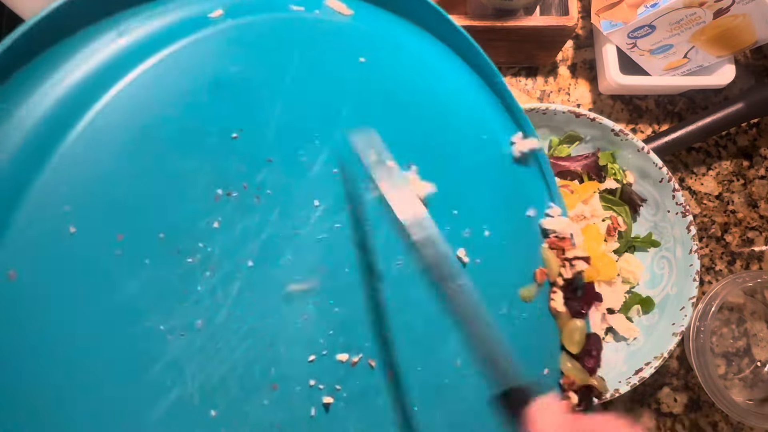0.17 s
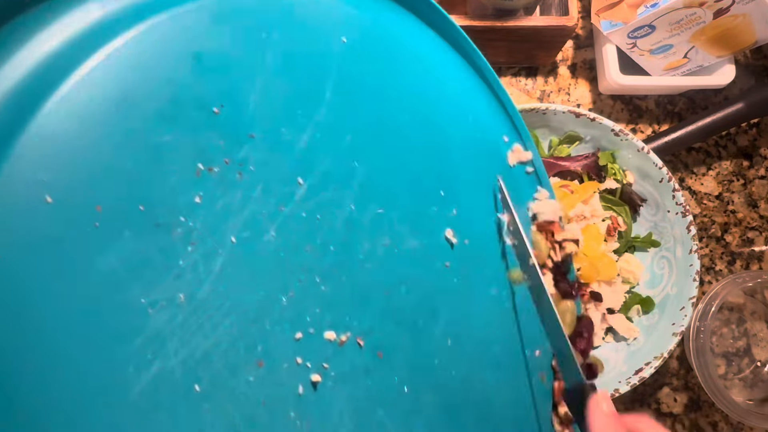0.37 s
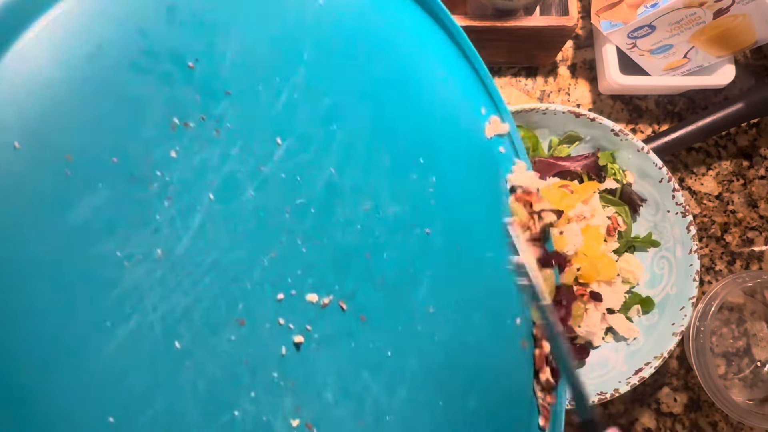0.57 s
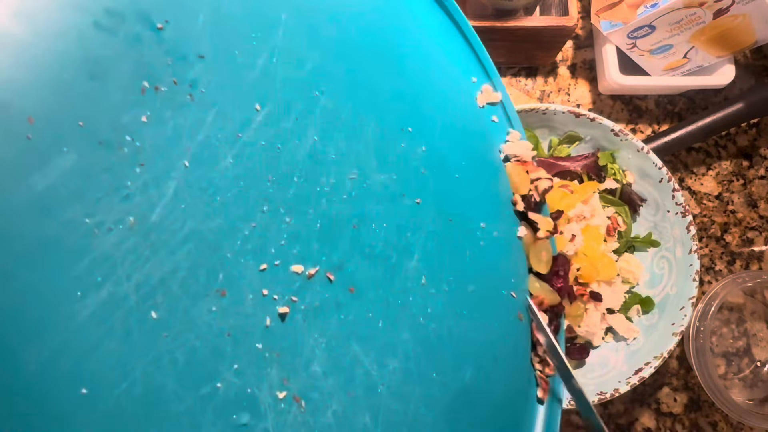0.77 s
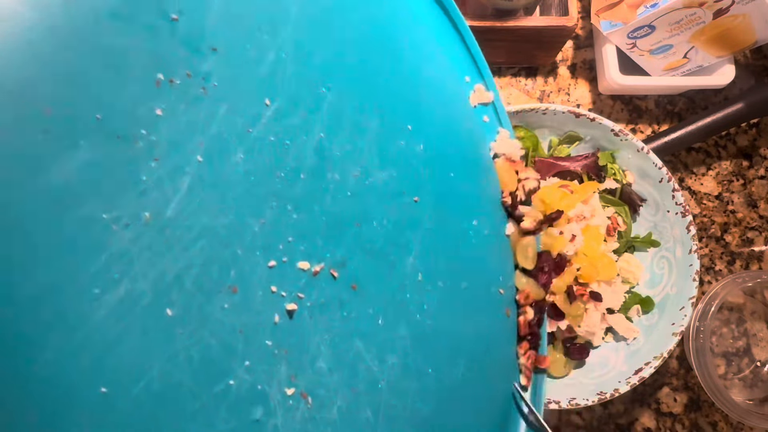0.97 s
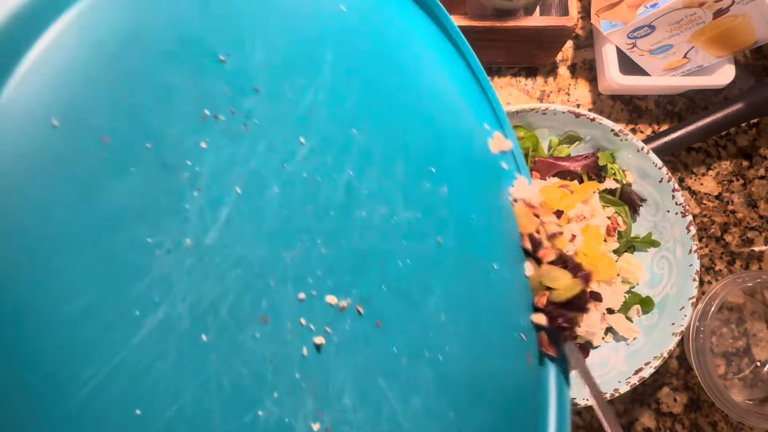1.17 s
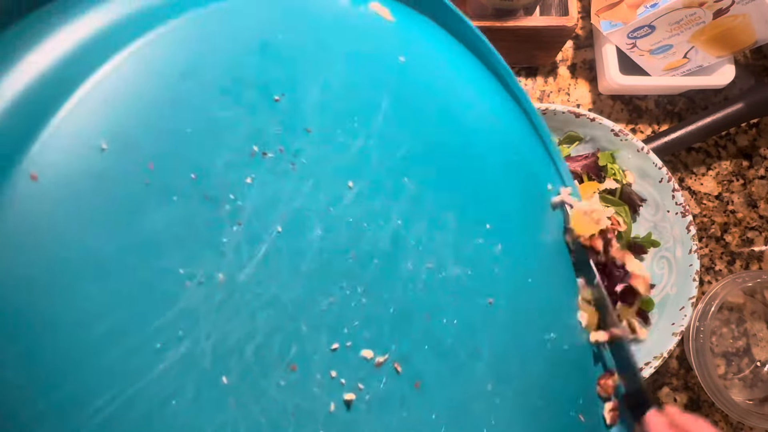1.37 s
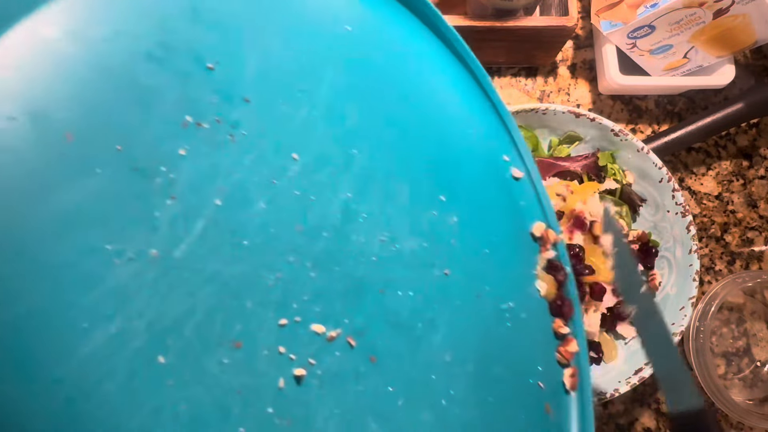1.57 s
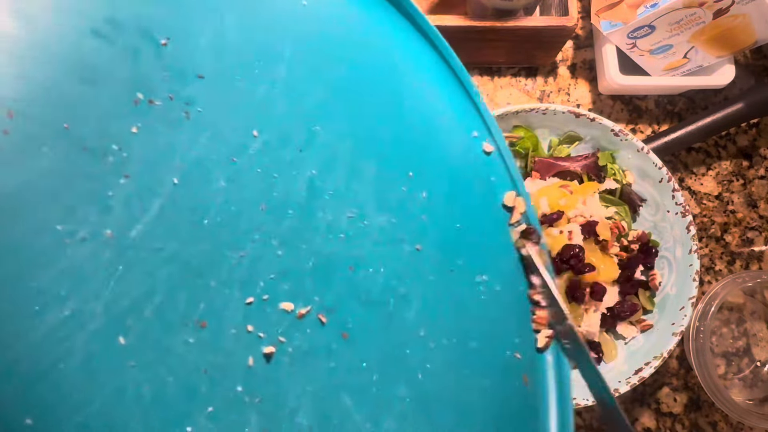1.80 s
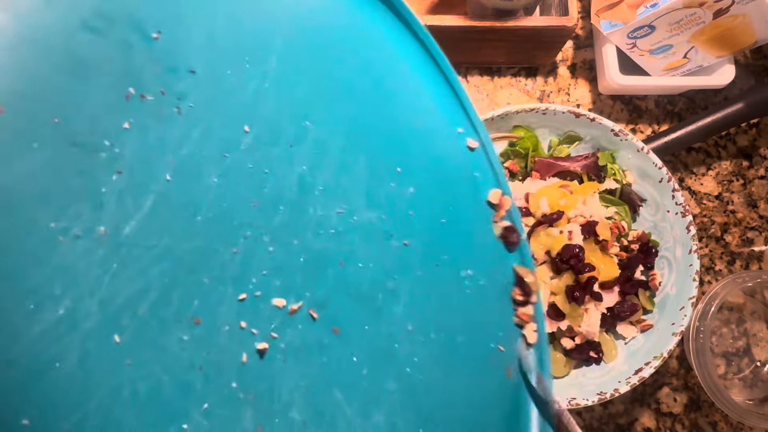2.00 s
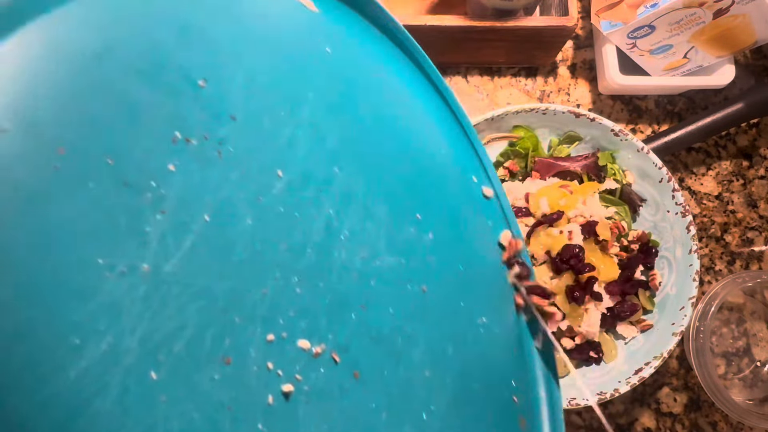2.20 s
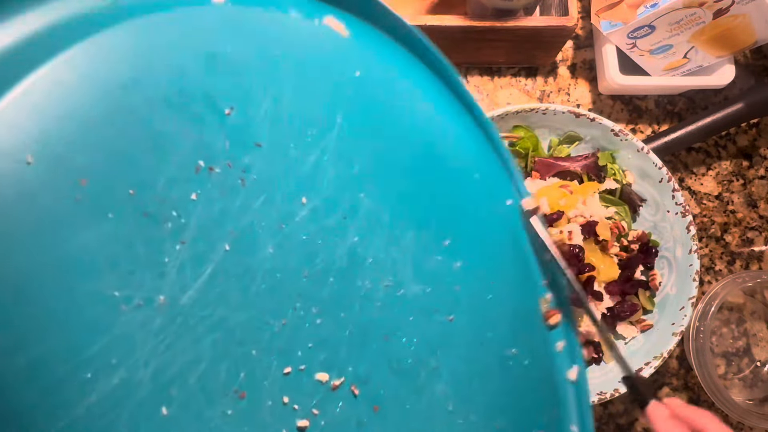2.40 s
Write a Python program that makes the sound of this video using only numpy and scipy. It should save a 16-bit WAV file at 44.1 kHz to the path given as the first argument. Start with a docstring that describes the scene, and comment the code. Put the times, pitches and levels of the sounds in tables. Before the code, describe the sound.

Knife scraping and knocking on a thin plastic board as soft food bits drop off.

```python
"""Knife clearing a cutting board

A kitchen knife sweeps chopped food off a thin plastic board into a bowl, close by in a small kitchen.
The blade lands, bounces and scrapes. Each contact sends a bending wave through the sheet (treble first,
a tiny falling chirp) and rings its modes; heavy ones make the whole board wobble.
Crumbs crackle ahead of the blade, soft food pats on the board and into the bowl, an appliance hums."""
import sys
import numpy as np
from scipy import signal
from scipy.fft import rfft, irfft, next_fast_len
from scipy.io import wavfile

SR = 44100
rng = np.random.default_rng(int(sys.argv[2]) if len(sys.argv) > 2 else 0)


def dump_mix(stems):
    """Bounce the given channels to the path in sys.argv[1] as a 16-bit WAV at rate SR."""
    frames = np.atleast_2d(stems).T  # one column per channel
    limited = np.clip(frames, -1, 1)  # hard clip at full scale
    pcm = np.round(limited * 32767).astype(np.int16)
    wavfile.write(sys.argv[1], SR, pcm)


N = 108045
SIZE = next_fast_len(N + SR // 2)   # layers are mixed as spectra, with room for their tails
HZ = np.maximum(np.arange(SIZE // 2 + 1) * SR / SIZE, 1)
TIME = np.arange(SIZE) / SR
SIDE = np.array([[1], [-1]])   # left plus, right minus


def from_db(db):
    """Decibels to gain."""
    return 10 ** (np.asarray(db) / 20)


def unit_rms(x):
    """Scale to rms 1."""
    return x / np.sqrt(np.mean(x ** 2) + 1e-20)


def curve(points):
    """Join (f/Hz, value) breakpoints on a log-frequency axis."""
    hz, value = np.transpose(points)
    return np.interp(np.log(HZ), np.log(hz), value)


def high_pass(hz, order=2):
    """Response of a causal low cut."""
    return signal.freqz(*signal.butter(order, hz, "high", fs=SR), worN=HZ, fs=SR)[1]


def click_at(start):
    """Spectrum of a unit click, its start in seconds."""
    return np.exp(-2j * np.pi * HZ * start)


# EQ points of an impact: f/Hz
IMPACT_BANDS = [130, 420, 1300, 2400, 5000, 9000]
# blade hits and bounces, plus the low thud of one food drop at 0.704 s:
# t/s, then relative level/dB at each EQ point
IMPACTS = [(0.2085, 26, 21, 12, 9, 1, -26), (0.2249, 20, 11, 10, 9, -16, -17),
           (0.2404, -4, 20.5, 3, -9, -6, -11), (.2455, 27.5, 16.5, 12, -11, 1, -13),
           (0.2598, -5, 15, 3, 13, -21, -7), (0.2711, 13, 4, 11.5, -4, 9, -31),
           (.2962, -13, 6, 11, 7, -16, -5), (.3008, -16, 6, -6, 0, -1, -5.5),
           (0.325, -29, 5, 1, 3.5, -14, -8), (0.4983, 28.5, 18, 5.5, -2, -0.5, -30),
           (0.5226, 8, 17.5, 1.5, -21, -12, -33), (0.5277, 18, 12.5, 9.5, -6, -18, -15),
           (.547, 19, -16, -2.5, 4.5, -25, -9.5), (0.6386, -22, -15, -4, -2.5, -1.5, -15),
           (0.704, 1, 2.5, -9, -16, -26, -38), (0.8913, -31, -15, -11, -7, -31, -47),
           (0.907, 6, 4.5, -1.5, 3, -9.5, -29), (0.9343, -9, 1, -8, -6, -15.5, -40),
           (0.9827, -10, 4.5, 4, -2, -8.5, -32), (1.5553, -3, -16, 0.5, -6, -5, -32),
           (1.5818, -10, -17, -7, -8.5, -11.5, -42), (1.7005, 22, 22, 15, 8.5, 7, -7),
           (1.7125, 29, 4.5, 6.5, -2.5, 2, -14), (1.7215, 23.5, 13, -22, -16, -1.5, -14),
           (1.7448, -3, -2, -8, -18, -17, -16), (1.9809, -3, 5, 3, -8.5, -16, -19.5),
           (2.03, 25.5, 8.5, 3, 8, 2, -7.5)]
def impacts(chatter_s=0.0022, chatter_hz=3000):
    """Blade contacts and one food thud, each a coloured click; the treble chatters as the edge settles."""
    share = 0.99 / (1 + (chatter_hz / HZ) ** 3)
    fade = np.exp(-TIME[:SR // 20] / chatter_s)
    out = 0
    for start, *levels in IMPACTS:
        chatter = rfft(rng.standard_normal(len(fade)) * fade / np.sqrt(np.sum(fade ** 2)), SIZE)
        colour = from_db(curve(list(zip(IMPACT_BANDS, levels))))
        out += click_at(start) * colour * (np.sqrt(1 - share) + np.sqrt(share) * chatter)
    eq_db = curve([(300, -5.5), (1300, -1.5), (4000, -4.5), (9000, -2), (12000, 0.5), (16000, -9)])
    return out * high_pass(hz=94) * from_db(eq_db)


def slips(eq, per_s, spread_db):
    """Tiny random slips of the edge, uneven in size: a grain texture at rms 1."""
    sizes = from_db(spread_db * np.minimum(rng.exponential(1, SIZE), 4))
    signs = rng.choice([-1, 1], SIZE)
    clicks = sizes * signs * (rng.random(SIZE) < per_s / SR)
    return unit_rms(irfft(rfft(clicks) * from_db(curve(eq)), SIZE))


def blade_travel(spectrum, depth_db=3.5, shifts_per_s=14):
    """Each third of an octave swells and fades on its own as the blade moves over the sheet."""
    band_index = np.clip(3 * np.log2(HZ / 400), 0, 14)
    out = 0
    for k in range(15):
        swell = np.interp(TIME * shifts_per_s + rng.random(), np.arange(200), rng.standard_normal(200))
        band = irfft(spectrum * np.maximum(1 - abs(band_index - k), 0), SIZE)
        out += band * from_db(depth_db * swell)
    return rfft(out)


# scrape envelopes, one list a stroke: t/s, relative hiss level/dB, relative grit level/dB
STROKES = [
    [(0, -53, -38), (.045, -68, -87), (.12, -73, -71)],
    [(.225, -52, -30.5), (.25, -41.5, -27), (.272, -31, -23), (.3, -34.5, -29), (.328, -37, -48),
     (.345, -54, -73), (.42, -70, -60)],
    [(.505, -70, -39), (.516, -43, -26), (.537, -35.5, -34), (.555, -47.5, -52), (.575, -60, -50),
     (.63, -64, -76)],
    [(.99, -63.5, -43.5), (1.04, -49.5, -45), (1.09, -44.5, -39), (1.125, -53, -40), (1.19, -45.5, -41),
     (1.255, -43, -48.5), (1.34, -48.5, -47), (1.425, -64.5, -46), (1.495, -49, -47.5), (1.53, -68, -68),
     (1.66, -78, -88)],
    [(1.705, -58, -60), (1.73, -39.5, -56), (1.755, -51.5, -50), (1.78, -60, -61), (1.84, -88, -62)],
    [(1.998, -60, -65), (2.008, -44.5, -43), (2.022, -58, -84), (2.065, -57.5, -41.5), (2.125, -39, -46),
     (2.16, -45, -47), (2.2, -54, -40), (2.26, -48, -52), (2.33, -56.5, -45), (2.38, -59.5, -58.5),
     (2.398, -48, -40.5), (2.45, -122, -113)],
]
# EQ of the bright hiss: f/Hz, level/dB
HISS_EQ = [(1000, -3), (2400, -4), (3500, -1), (5700, -0.5), (7200, -5), (9500, -7), (11500, -21.5),
           (15500, -17)]
# EQ of the coarse grit: f/Hz, level/dB
GRIT_EQ = [(120, -24.5), (300, -11), (550, -1), (850, 1.5), (1600, 6.5), (2400, -3), (4000, -6),
           (9000, -62)]
def blade_scrape():
    """The edge hisses over fine texture and catches on scratches; hard pressure adds a top sizzle."""
    hiss_env = grit_env = 0
    for stroke in STROKES:
        times, hiss_db, grit_db = np.transpose(stroke)
        hiss_env += from_db(np.interp(TIME, times, hiss_db, left=-200, right=-200))
        grit_env += from_db(np.interp(TIME, times, grit_db, left=-200, right=-200))
    sizzle = unit_rms(irfft(rfft(rng.standard_normal(SIZE)) * high_pass(hz=10800, order=3), SIZE))
    sizzle_env = from_db(-43) * (hiss_env / hiss_env.max()) ** 1.9

    def friction():
        hiss = hiss_env * slips(HISS_EQ, per_s=9000, spread_db=4)
        grit = grit_env * slips(GRIT_EQ, per_s=500, spread_db=3)
        return rfft(hiss + from_db(-5) * grit)

    mid = friction()
    side = 0.7 * friction() * curve(STEREO_WIDTH) * SIDE
    return blade_travel(mid) + side + rfft(sizzle_env * sizzle)


# ring of the sheet: f/Hz, level/dB over the direct wave, t60/s before the cap
SHEET_MODES = [(178.6, 4, 0.086), (311.4, 2, 0.12), (345, 0, 0.37), (403.3, 1.5, 0.18), (495.7, 4, 0.048),
               (603.2, 6.5, 0.16), (646, 4.5, .1), (1135, -3, 0.15), (1094, -35, 0.035),
               (1282, -41.5, 0.12), (1500, -12, 0.046), (1775, -9.5, 0.033), (1870, -15.5, 0.03),
               (2200, -3, 0.072)]
def board_response(t60_cap_s=0.2, spread_s=0.002577, top_hz=3750):
    """The damped plastic carries a bending wave, rings at its modes and echoes from its rim."""
    modes = sum(from_db(db) / (1 + 2j * np.pi * (HZ - hz) * min(t60, t60_cap_s) / np.log(1000))
                for hz, db, t60 in SHEET_MODES)
    # wave speed grows with the root of frequency, up to top_hz
    delay = spread_s * np.maximum(np.sqrt(1000 / HZ) - np.sqrt(1000 / top_hz), 0)
    chirp = np.exp(-2j * np.pi * np.cumsum(delay) * SR / SIZE)
    rim = from_db(-4.5) * echoes(t60=0.075, damping=0.54) * high_pass(hz=327, order=1)
    return chirp * (1 + modes + rim)


# hollow knocks, pitched by where the blade lands: t/s, level/dB, f/Hz, t60/s
HOLLOW_KNOCKS = [(0.2116, -10.5, 362, 0.041), (0.5239, -13.5, 595, 0.039), (.909, -14, 455, 0.025),
                 (.911, -32, 583, 0.12), (0.987, -25.5, 394, 0.064), (1.703, -18, 470, 0.043),
                 (2.034, -38.5, 563, 0.15)]
def board_knocks(attack_s=0.001):
    """A firm landing rings the patch of sheet under the blade."""
    out = 0
    for start, db, hz, t60 in HOLLOW_KNOCKS:
        t = np.maximum(TIME - start, 0)
        envelope = from_db(db - 60 * t / t60) * (1 - np.exp(-t / attack_s))
        out += envelope * np.sin(2 * np.pi * hz * t)
    return rfft(out)


# low-end wobble of the whole board: t/s, level/dB, f/Hz, attack/s
LOW_WOBBLES = [(0.213, -21.5, 91, 0.006), (.504, -24, 90, 0.01), (0.713, -38.5, 87, 0.01),
               (0.912, -23.5, 80.3, 0.018), (0.993, -27.5, 76.4, 0.01), (1.708, -20.5, 96.5, 0.008),
               (1.992, -33, 79, 0.023), (2.036, -20, 79.4, 0.016)]
def board_wobbles():
    """The board's lowest bending mode swells and dies within a few cycles."""
    out = 0
    for start, db, hz, attack_s in LOW_WOBBLES:
        t = np.maximum(TIME - start, 0)
        swell = (t / attack_s * np.exp(1 - t / attack_s)) ** 0.87
        out += from_db(db) * swell * np.sin(2 * np.pi * hz * t)
    return rfft(out)


# soft food patting on the board and into the bowl: t/s, relative level/dB, f/Hz, half-width/octaves
FOOD_PATS = [(0.589, -3.5, 1200, 0.34), (.649, -10.5, 1350, 0.54), (.7048, 7.5, 993, 0.32),
             (0.7899, -0.5, 1670, 0.71), (0.795, -14.5, 1900, 1), (1.083, 2, 2280, 0.34),
             (1.154, -7, 1170, 1), (1.172, -3, 975, 1), (1.183, 4, 436, 0.32), (1.201, 1, 1070, 0.34),
             (1.231, -6, 920, .8), (1.268, 1, 1210, 0.57), (1.294, -9, 905, 0.49), (1.377, -7, 1320, 0.4),
             (1.425, -18, 1870, 1), (1.917, -17, 1850, 0.84), (2.118, -4, 1250, 0.94),
             (2.157, 3.5, 810, 0.65), (2.177, -7.5, 1127, 1), (2.2, -5, 770, 0.66), (2.225, 1, 1477, 0.28)]
def food_pats():
    """Soft pieces land on the board and in the bowl, each with a short damp pat."""
    pats = sum(click_at(start) * from_db(db) / np.sqrt(1 + (np.log2(HZ / hz) / width) ** 4)
               for start, db, hz, width in FOOD_PATS)
    softness_db = curve([(100, -20), (300, 5.5), (700, 1.5), (4000, -1.5), (8000, -14), (12000, -21)])
    landing = 0.64 * click_at(0.00098) + 0.9 * echoes(t60=0.036, damping=0.05)
    return pats * from_db(softness_db) * high_pass(hz=170) * landing


# the blade pushes a heap of food: start t/s, end t/s
HEAP_PUSHES = [(1.01, 1.47), (2.1, 2.3)]
# octave bands of the crackle: f/Hz, relative level/dB
CRUMB_BANDS = [(150, 5.5), (380, 0.5), (700, -3.5), (1000, 0.5), (1500, -1.5), (2200, -5)]
def crumbs(per_s=130, gain_db=-10, spread_db=4, fade_db=2.5):
    """Small pieces tumble ahead of the blade in damp ticks that fade as the heap runs out."""
    out = 0
    for hz, db in CRUMB_BANDS:
        clicks = np.zeros(SIZE)
        for start, end in HEAP_PUSHES:
            count = int((end - start) * per_s / len(CRUMB_BANDS))
            progress = (np.arange(count) + rng.random(200)[:count]) / count
            scatter_db = spread_db * rng.standard_normal(200)[:count]
            onsets = ((start + (end - start) * progress) * SR).astype(int)
            clicks[onsets] = from_db(gain_db + db - fade_db * (progress - 0.5) + scatter_db)
        band = signal.butter(2, [hz / np.sqrt(2), hz * np.sqrt(2)], "band", fs=SR, output="sos")
        out += signal.sosfilt(band, clicks + 1e-18)
    return rfft(out)


# width of the echoes, scrape and room tone: f/Hz, relative side gain
STEREO_WIDTH = [(150, 0.061), (700, 0.59), (1700, 0.1), (3500, 0.69), (9000, 0.58), (11000, 0.07)]
def echoes(t60, damping):
    """Dense stereo reflections; t60 holds at 1 kHz and damping shortens each higher octave."""
    octave = np.clip(np.log2(HZ / 125), 0, 7)
    noise, t = rng.standard_normal((2, SR // 2)), TIME[:SR // 2]
    tails = 0
    for k in range(8):
        band_t60 = t60 * 2 ** (-damping * (k - 3))
        fade = from_db(-60 * t / band_t60) * (1 - np.exp(-t / 0.002))
        band = np.maximum(1 - abs(octave - k), 0)
        tails += rfft(noise * fade / np.sqrt(np.sum(fade ** 2)), SIZE) * band
    mid, side = tails
    width = curve(STEREO_WIDTH)
    return mid * np.sqrt(1 - width ** 2) + side * width * SIDE


# EQ of the kitchen air: f/Hz, level/dB
AIR_EQ = [(25, -14), (60, 5.5), (100, 7.5), (160, -1), (250, -9.5), (400, -1.5), (800, -17), (1700, -19.5),
          (3000, -25.5), (6500, -28.5), (9500, -45.5), (12000, -64)]
def room_tone(air_db=-51.5, hum_db=-49, hum_hz=59.7):
    """A bed of dark room air and the hum of an appliance."""
    mid, side = rfft(rng.standard_normal((2, SIZE))) * from_db(curve(AIR_EQ))
    air = unit_rms(irfft(mid + 1.2 * side * curve(STEREO_WIDTH) * SIDE, SIZE))
    hum = np.sqrt(2) * np.sin(2 * np.pi * hum_hz * TIME)
    return rfft(from_db(air_db) * air + from_db(hum_db) * hum)


# pan across the spectrum: f/Hz, left-over-right level/dB
STEREO_BALANCE = [(80, 1), (350, 2.2), (800, 1.5), (1100, -1), (2000, -.4), (10000, 0)]
# phase between the channels: f/Hz, left lead/rad
STEREO_PHASE = [(100, 0), (2000, 0), (3600, .5), (5000, 0), (8000, -1.7), (9300, -2.0), (10700, -3.05),
                (13500, -3.15), (15700, -4.0)]
def scene():
    """Knife, board and food up close, with a short kitchen reverb, placed in stereo."""
    board = (impacts() + blade_scrape()) * board_response()
    close = board + board_knocks() + food_pats() + crumbs()
    reverb = from_db(-17) * echoes(t60=0.36, damping=0.038)
    mix = close * (1 + reverb) + board_wobbles() + room_tone()
    pan = from_db(SIDE / 2 * curve(STEREO_BALANCE))
    phase = np.exp(1j * SIDE / 2 * curve(STEREO_PHASE))
    return irfft(mix * pan * phase, SIZE)[:, :N]


def record(dry):
    """A steep high cut takes off the very top."""
    return signal.sosfiltfilt(signal.butter(24, 15900, fs=SR, output="sos"), dry)


dry = scene()
out = record(dry)
dump_mix(out)
```